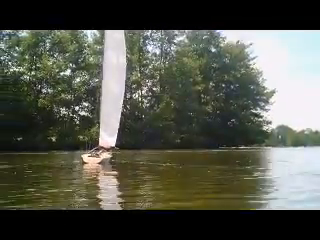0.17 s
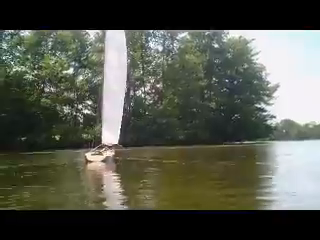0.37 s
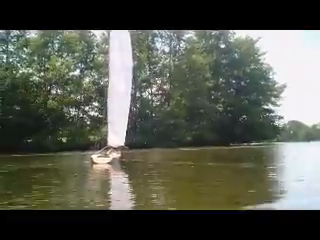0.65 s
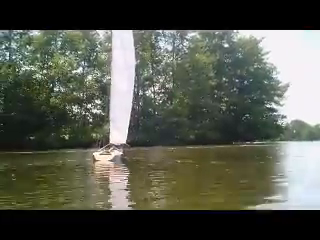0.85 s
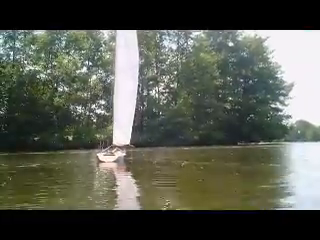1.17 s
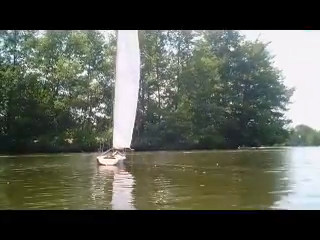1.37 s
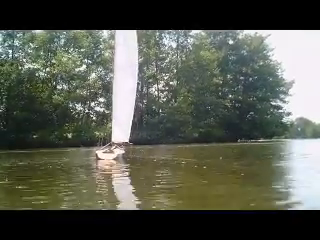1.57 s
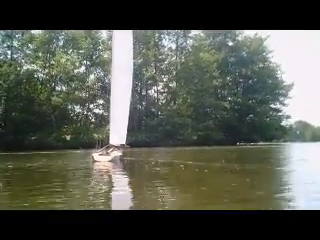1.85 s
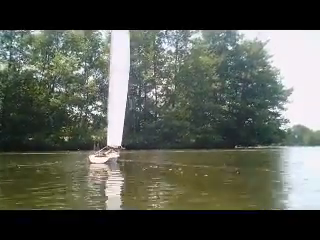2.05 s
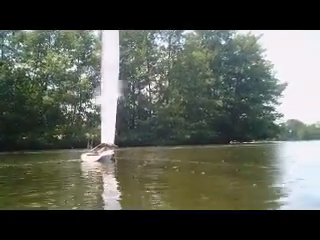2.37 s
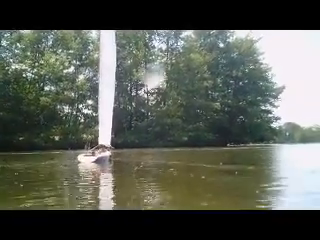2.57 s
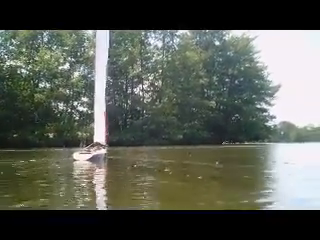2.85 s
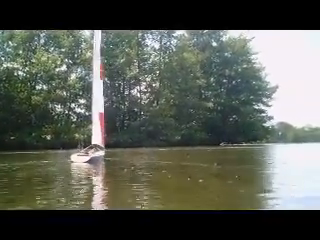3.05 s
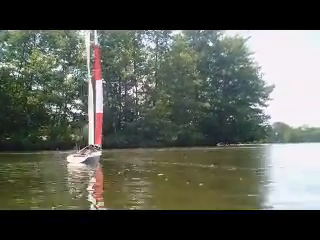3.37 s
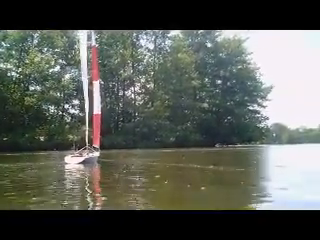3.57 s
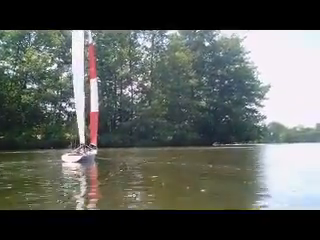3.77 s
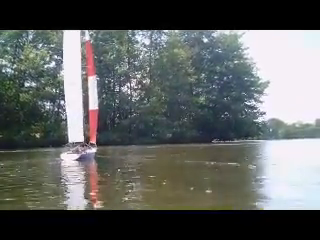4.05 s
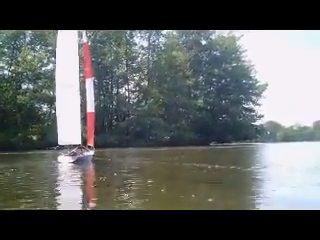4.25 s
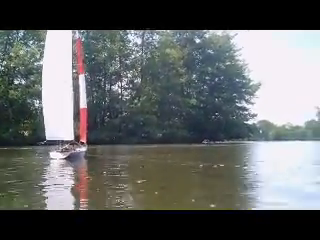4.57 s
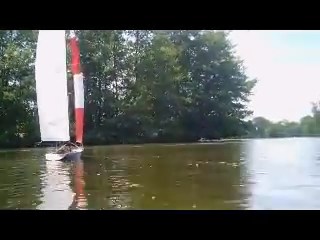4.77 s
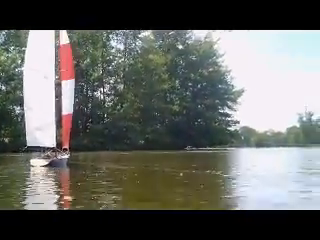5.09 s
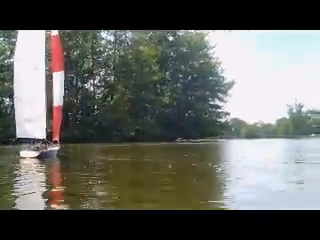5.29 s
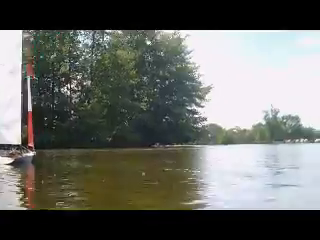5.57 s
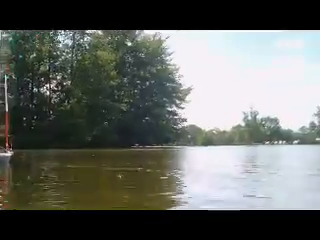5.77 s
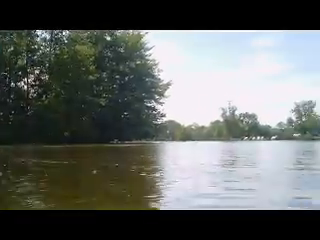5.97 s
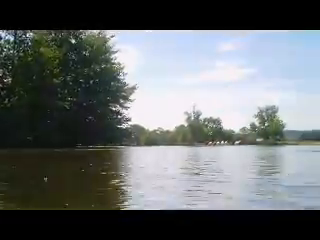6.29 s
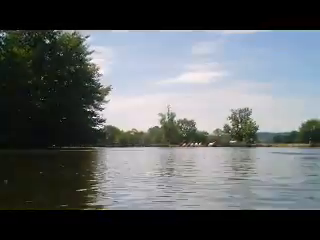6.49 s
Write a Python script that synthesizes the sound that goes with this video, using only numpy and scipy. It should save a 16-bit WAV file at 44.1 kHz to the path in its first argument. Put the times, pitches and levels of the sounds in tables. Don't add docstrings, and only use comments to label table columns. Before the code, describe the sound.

Close, gritty droning of a little boat's spinning shaft, with ticking and low water rumble; a clattering, grinding spell interrupts before the even buzz returns.

```python
import sys
import numpy as np
from scipy import signal
from scipy.fft import rfft, irfft, next_fast_len
from scipy.io import wavfile
from scipy.ndimage import uniform_filter1d, map_coordinates

SR = 44100
rng = np.random.default_rng(int(sys.argv[2]) if len(sys.argv) > 2 else 0)


def master(y):
    cut = np.clip(np.atleast_2d(y).T, -1, 1)
    pcm = np.round(cut * 32767)
    wavfile.write(sys.argv[1], SR, pcm.astype(np.int16))


def attenuation_scalar(level_db):
    decades = np.asarray(level_db, float) / 20
    return 10 ** decades


N = 292383

SHAFT_HZ = 46.92
CHATTER_START_S, CHATTER_END_S = 3.06, 5.37

# t/s, level/dB
WATER_WASH = [(0.0, -34), (0.24, -30), (0.76, -32), (1.81, -32), (1.85, -32), (1.92, -28), (2.36, -38),
              (2.42, -29), (2.69, -34.5), (2.84, -30.5), (3.45, -31), (3.47, -26.5), (3.51, -31.5),
              (5.43, -32), (5.47, -36.5), (5.54, -33.5), (6.54, -32.5), (6.63, -34)]
# f/Hz, level/dB per Hz
RUMBLE_TONE = [(12, -3.5), (30, -39), (55, -9), (85, -1.5), (125, -6.5), (170, -3), (225, -2), (270, -8.5),
               (330, -7), (420, -17), (500, -14.5), (650, -68), (1100, -120)]
# f/Hz, level/dB per Hz
WASH_TONE = [(180, -32), (300, -1), (800, -12.5), (930, -3.5), (1030, -11), (1200, -13), (1430, -26.5),
             (1600, -20), (2000, -27.5), (2800, -28.5), (3400, -30.5), (3720, -39.5), (4100, -31.5),
             (5400, -37)]
# t/s, f/Hz, level/dB
SERVO_WHINE = [
    (3.15, 1260, -83),
    (3.3, 1320, -50),
    (3.52, 1350, -44),
    (3.68, 1290, -48),
    (3.8, 1260, -61),
]
# f/Hz, level/dB per Hz
GEAR_TONE = [(1000, -40), (1200, -7), (1350, -2), (1570, 5), (1750, -1.5), (1950, -29)]
# t/s, 4 per turn level/dB, 5 per turn level/dB
HUM_LEVELS = [(0, -28, -57), (.17, -34.5, -48), (.3, -48, -37.5), (.55, -31.5, -38.5), (1.2, -26.5, -42),
              (1.75, -32, -36), (1.95, -28.5, -30.5), (2.11, -29, -31), (2.2, -36, -49), (2.36, -40, -42),
              (2.43, -29, -30.5), (3.0, -28.5, -35.5), (3.12, -34.5, -37.5), (4.35, -37.5, -37),
              (4.7, -39, -37.5), (5.3, -38.5, -41), (5.45, -40.5, -33.5), (6.63, -39, -33.5)]
# cycles per turn, which hum level it follows (0, 1 or 2), level/dB
HUM_ORDERS = [(4, 0, 0), (5, 1, 1.5), (6, 2, 0), (3, 1, -7), (7, 2, -3), (15, 0, -19), (19, 0, -24),
              (20, 0, -19)]
# t/s, f/Hz, level/dB
LOW_BOOM = [(0, 82, -31), (.3, 87, -29.5), (.46, 88, -40), (.55, 95, -29.5), (.95, 80, -46),
            (1.15, 92, -31.5), (1.58, 93, -30.5), (1.68, 90, -42), (1.86, 86, -28.5), (2.15, 93.5, -31),
            (2.8, 85.78, -34), (3.05, 93.5, -31.5), (4.55, 93.5, -31), (4.7, 84, -39), (5.1, 93, -26),
            (5.38, 86, -52), (5.5, 93.6, -29.5), (6.63, 93.6, -29.5)]
# t/s, peak level/dB, strikes, shaft turns between strikes
TICK_SPELLS = [(.1685, -37, 2, 2.8), (0.4065, -40, 2, 2.5), (0.6206, -32, 2, 1.8), (0.8293, -35, 3, 3.1),
               (1.105, -35, 2, 0.93), (1.259, -33.5, 3, 6.6), (1.771, -38.5, 2, 1.15), (1.884, -31.5, 4, 3),
               (2.233, -36.5, 2, 7), (2.4367, -31, 4, 1.87), (2.688, -33.5, 4, 2.1),
               (2.8994, -31.5, 4, 3.8), (3.0032, -33.5, 2, 1.07), (3.2503, -36, 3, 3.48),
               (3.4607, -37, 2, 2.64), (3.589, -31.5, 2, 3.4), (3.92, -32.5, 2, 1.5), (4.107, -33, 2, 4.5),
               (4.218, -35.5, 2, 1.1), (4.2987, -31.5, 2, 1.8), (4.6245, -35, 2, .33),
               (5.1115, -32, 2, 1.5), (5.2718, -35, 2, 4.6), (5.381, -34, 4, 2.2), (5.547, -32, 2, 4.5),
               (5.6982, -32.5, 2, 1.8), (5.8886, -31.5, 2, 8.5), (6.1605, -37, 2, 1.01),
               (6.247, -31.5, 3, 4.68), (6.3616, -31.5, 2, 8.4)]
# f/Hz, width/Hz, level/dB
LOOSE_PART_RING = [(3140, 1430, -6.5), (4580, 490, 2), (4990, 96, -1.5)]
# t/s, level over a mean slap/dB, shell level/dB
SLAP_EFFORT = [(0, 2.5, 0.5), (.4, -0.5, -1), (.7, -0.5, -0.5), (1.2, -2, -1), (1.8, 1, 0.5), (1.92, 4, 3),
               (2.1, 0, 4.5), (2.2, -1.5, -1), (2.36, 3, 1), (2.45, 0.5, 1.5), (3.05, 5, 3), (5.37, -6, -7),
               (5.72, -1, -7), (5.78, -1.5, 1), (6.63, 0, -3.5)]
# t/s, delay/turns
SLAP_DELAY = [(0, 0.82), (.5, 0.86), (2.2, 0.84), (2.4, 0.83), (3.1, .87), (5.4, 0.82), (6.63, 0.76)]
# t/s, peak level/dB, wait for second knock/s, its level/dB
CHATTER_KNOCKS = [(3.087, -26, .038, -25), (3.173, -22.5, .033, -23.5), (3.241, -21, 0.042, -25),
                  (3.309, -22.5, 0.027, -23), (3.376, -24, 0.035, -21), (3.45, -19.5, 0.037, -27),
                  (3.511, -26.5, 0.07, -22), (3.603, -22, .051, -25), (3.685, -22, 0.042, -22.5),
                  (3.77, -20.5, 0.052, -25), (3.869, -26, 0.048, -20.5), (3.951, -25.5, 0.028, -23),
                  (4.021, -24.5, 0.028, -26), (4.108, -21, 0.033, -30), (4.194, -24, 0.037, -25.5),
                  (4.277, -22.5, 0.023, -26), (4.365, -21, 0.029, -21), (4.45, -21.5, .039, -24),
                  (4.535, -22.5, 0.03, -22.5), (4.621, -21, .032, -36), (4.705, -21, 0.025, -24),
                  (4.791, -21.5, .036, -24), (4.856, -22, 0.035, -22), (4.919, -35, 0.021, -28),
                  (4.981, -20.5, 0.024, -25), (5.066, -22, .041, -36), (5.16, -27, .013, -21),
                  (5.213, -23.5, 0.053, -29), (5.302, -22, 0.033, -22.5)]
# t/s, peak level/dB, brightness/dB
HARD_SLAPS = [(0.309, -13, -22), (0.636, -17.5, -17), (0.849, -13.5, -16), (0.939, -19, -25),
              (1.365, -27, -24), (2.449, -13, -26), (2.491, -13, -27), (2.535, -19, -15), (2.681, -28, -9),
              (2.703, -23, -19), (2.771, -41, -21), (2.916, -17, -22), (5.815, -16.5, -33)]
# f/Hz, width/Hz, level/dB
PANEL_RING = [(284, 154, -15), (442, 140, -8.5), (659, 105, -11.5), (925.2, 73.4, -0.5), (1035, 140, -18.5)]
# f/Hz, width/Hz, level/dB
SHELL_RING = [(1623, 37, -1), (2227, 116, 5), (2750, 100, 4), (4092, 207, 0.5)]
# f/Hz, share of the time
MUTED_SHARE = [(3450, 0), (3600, .06), (3740, .35), (3860, 0), (5150, 0), (5330, .8), (5700, .85),
               (5850, .05), (6100, 0), (7100, 0), (7330, .5), (7550, .04), (9100, .05), (9400, .02),
               (9650, .25), (9800, 0), (12250, 0), (12400, .45), (12700, .45), (12900, .93)]


def unit(x):
    return x / np.sqrt(np.mean(x ** 2) + 1e-20)


def curves(rows, at=None):
    s, *columns = np.transpose(rows)
    when = np.arange(N) / SR if at is None else at
    return [np.interp(when, s, column) for column in columns]


def wobble(rate):
    knots = rng.standard_normal(int(N * rate / SR) + 4)
    return map_coordinates(knots, [np.arange(N) * rate / SR])


def filtered(x, response):
    size = next_fast_len(N + SR // 2)
    return irfft(rfft(x, size) * response(np.fft.rfftfreq(size, 1 / SR)), size)[:N]


def coloured(tone):
    hz, db = np.transpose(tone)
    shape = lambda f: attenuation_scalar(np.interp(np.log(f + 1), np.log(hz + 1), db))
    return unit(filtered(rng.standard_normal(N), shape))


def tone(hz):
    return np.sin(2 * np.pi * np.cumsum(hz) / SR)


def resonance(f, centre, width, db):
    return attenuation_scalar(db) * (1j * f * width / (centre * centre - f * f + 1j * f * width)) ** 2


def rung(force, modes, scatter_db=0):
    grid = np.fft.rfftfreq(8192, 1 / SR)
    peak = np.abs(irfft(sum(resonance(grid, *mode) for mode in modes))).max()
    total = 0
    for mode in modes:
        drifting = force * attenuation_scalar(scatter_db * wobble(40))
        total = total + filtered(drifting, lambda f: resonance(f, *mode))
    return total / peak


def blows(s, db, scrape, scrape_s):
    force = np.bincount(np.clip(np.round(s * SR).astype(int), 0, N - 1), attenuation_scalar(db), N)
    t = np.arange(-512, 513) / SR
    rub = signal.fftconvolve(force, np.exp(-(t / scrape_s) ** 2), mode="same")
    return force + scrape * rub * rng.standard_normal(N) / np.sqrt(scrape_s * SR)


def water():
    wash_db, = curves(WATER_WASH)
    rumble_db = -29 + .7 * (wash_db - wash_db.mean()) + 1.5 * wobble(4.21)
    rumble = unit(attenuation_scalar(1.97 * wobble(25)) * coloured(RUMBLE_TONE))
    wash = unit(attenuation_scalar(1.58 * wobble(30)) * coloured(WASH_TONE))
    return attenuation_scalar(rumble_db) * rumble + attenuation_scalar(wash_db - 2.5) * wash


def servo():
    hz, db = curves(SERVO_WHINE)
    whine = attenuation_scalar(db + 2.5 * wobble(13)) * tone(hz + 14 * wobble(30))
    on, off, fade_s = CHATTER_START_S, CHATTER_END_S, 0.22
    grinding, = curves([(on, 0), (on + fade_s, 1), (on + 0.45, 1), (off, .3), (off + fade_s, 0)])
    gears = grinding * attenuation_scalar(-50 + 1.3 * wobble(20)) * coloured(GEAR_TONE)
    return whine + gears


def hum():
    turn = 2 * np.pi * SHAFT_HZ * np.arange(N) / SR
    fourth_db, fifth_db = curves(HUM_LEVELS)
    sixth_db = fifth_db - 5.5 + 2 * wobble(5)
    level_db = [fourth_db, fifth_db, sixth_db]
    lines = 0
    for order, column, db in HUM_ORDERS:
        strength = attenuation_scalar(level_db[column] + db + .5 * wobble(18))
        phase = order * (turn + .5) + .3 * order * order + .06 * wobble(9)
        lines = lines - strength * np.cos(phase)
    boom_hz, boom_db = curves(LOW_BOOM)
    boom = attenuation_scalar(boom_db + 0.79 * wobble(12)) * tone(boom_hz + 1.16 * wobble(11))
    return np.sqrt(2) * (lines + boom)


def ticks():
    start_s, peak_db, strikes, turns = np.transpose(TICK_SPELLS)[..., None]
    nth = np.arange(4)
    struck = nth < strikes - .5
    s = (start_s + nth * turns / SHAFT_HZ)[struck]
    db = (peak_db + 0.91 * rng.standard_normal(struck.shape))[struck]
    luck = rng.random((len(s), 3, 2))
    bounce_s = s[:, None] + np.array([-.0082, .0082, .0165]) + 0.0052 * (luck[..., 0] - .5)
    bounce_db = db[:, None] - 1.5 - 11 * luck[..., 1]
    patter = rng.random((700, 2))
    patter_s = patter[:, 0] * N / SR
    patter_db = -60 - 2.5 * np.log(patter[:, 1] + 1e-3)
    all_s = np.r_[s, bounce_s.ravel(), patter_s]
    all_db = np.r_[db - .6, bounce_db.ravel(), patter_db]
    return rung(blows(all_s, all_db, scrape=.3, scrape_s=.0008), LOOSE_PART_RING)


MEAN_SLAP_DB = -26.5


def shell_db(slap_db):
    return -12.5 - (slap_db - MEAN_SLAP_DB)


def true_slaps():
    turns = np.arange(int(N / SR * SHAFT_HZ))
    turns = turns[(turns < CHATTER_START_S * SHAFT_HZ) | (turns > CHATTER_END_S * SHAFT_HZ)]
    effort_db, extra_shell_db = curves(SLAP_EFFORT, turns / SHAFT_HZ)
    delay, = curves(SLAP_DELAY, turns / SHAFT_HZ)
    at = (turns * SR / SHAFT_HZ).astype(int)
    strength_db = MEAN_SLAP_DB + effort_db + 1.2 * wobble(7)[at]
    luck = rng.standard_normal((len(turns), 3))
    s = (turns + delay) / SHAFT_HZ + 0.00012 * luck[:, 0]
    dull_db = strength_db + 1.1 * luck[:, 1] + .3
    bright_db = shell_db(strength_db) + extra_shell_db + .7 * luck[:, 2]
    return s, dull_db, bright_db


def chatter_slaps():
    first_s, first_db, after_s, second_db = np.transpose(CHATTER_KNOCKS)
    whim = rng.standard_normal((len(first_s), 5))
    graze_s = first_s + .018 + .002 * whim[:, 0]
    graze_db = first_db - 11 + 3.5 * whim[:, 1]
    s = np.r_[first_s, first_s + after_s, graze_s]
    dull_db = np.r_[first_db, second_db, graze_db] + .3
    bright_db = np.r_[shell_db(first_db), shell_db(second_db), shell_db(first_db)]
    return s, dull_db, bright_db + 1.74 + 2.2 * whim[:, 2:].T.ravel()


def slaps():
    hard_s, hard_db, hard_bright_db = np.transpose(HARD_SLAPS)
    groups = [true_slaps(), chatter_slaps(), (hard_s, hard_db - 6, hard_bright_db)]
    s, dull_db, bright_db = [np.concatenate(column) for column in zip(*groups)]
    sharp_db = dull_db + bright_db + 3.0
    dull = blows(s, dull_db, scrape=.25, scrape_s=.004)
    rebound_s = s + .003 + .003 * rng.random(len(s))
    sharp = blows(np.r_[s, rebound_s], np.r_[sharp_db - 2, sharp_db - 9], scrape=.3, scrape_s=.004)
    touch = blows(s + 0.0025, dull_db - 12, scrape=0, scrape_s=1)
    rasp = signal.fftconvolve(touch, np.hanning(SR // 70), mode="same") * coloured(WASH_TONE)
    return rung(dull, PANEL_RING, scatter_db=-0.2) + rung(sharp, SHELL_RING, scatter_db=0.7) + rasp


def scene():
    return (water() + servo() + hum() + ticks() + slaps())[None]


def muted(x):
    hz, _, z = signal.stft(x, SR, nperseg=2048)
    power = uniform_filter1d(np.abs(z) ** 2, size=4, axis=0)
    power = uniform_filter1d(power, size=3, axis=1)
    whim = uniform_filter1d(rng.standard_normal(z.shape), size=7, axis=1)
    band = (np.abs(power) * attenuation_scalar(22 * whim))[np.arange(len(hz)) // 4 * 4]
    rank = np.argsort(np.argsort(band, axis=1), axis=1) / band.shape[1]
    share = np.interp(hz, *np.transpose(MUTED_SHARE))
    return signal.istft(z * (rank >= share[:, None]), SR, nperseg=2048)[1][:N]


def before_sampling(f):
    treble_db = np.interp(f, (5175, 5360, 5110, 5860), (-0.5, -5, -15, -95))
    return attenuation_scalar(treble_db) * f ** 2 / (f ** 2 + 11 ** 2)


def band_limit(x):
    return signal.sosfilt(signal.butter(12, 13070, fs=SR, output="sos"), x)


def record(dry):
    hold = 4
    held = np.repeat(filtered(dry[0], before_sampling)[::hold], hold)[:N]
    mirrored = filtered(held, lambda f: f < 13100)
    return band_limit(muted(mirrored)[None])


dry = scene()
out = record(dry)
master(out)
```